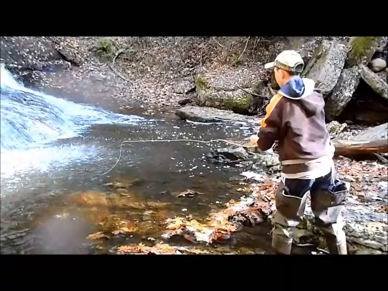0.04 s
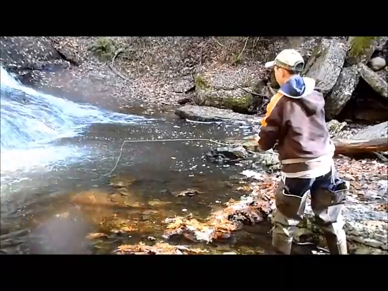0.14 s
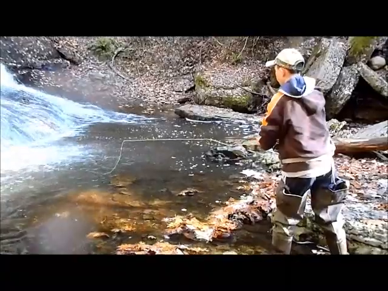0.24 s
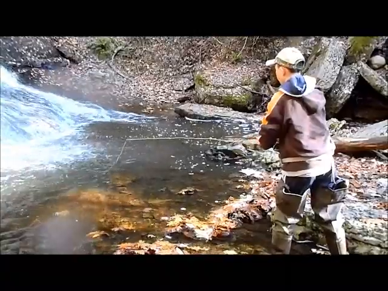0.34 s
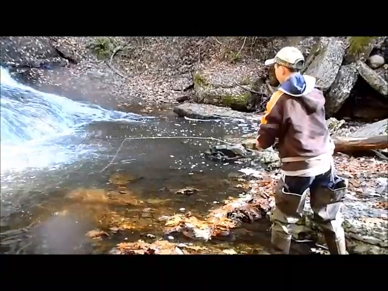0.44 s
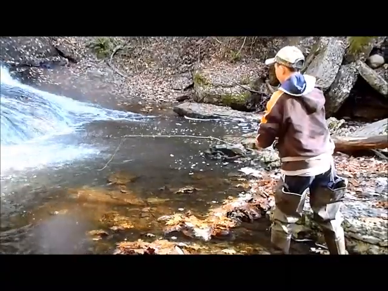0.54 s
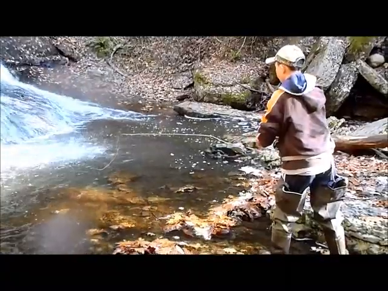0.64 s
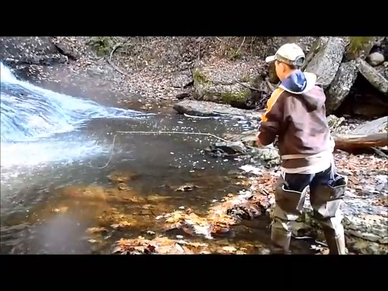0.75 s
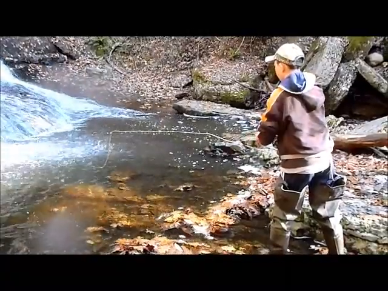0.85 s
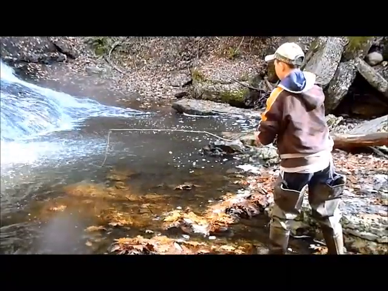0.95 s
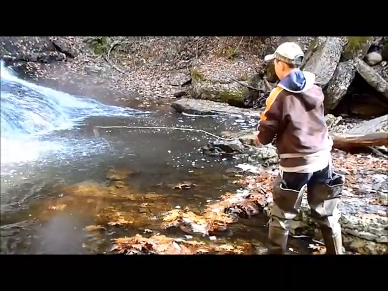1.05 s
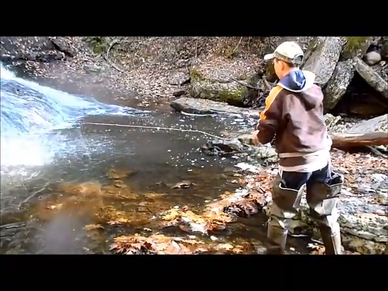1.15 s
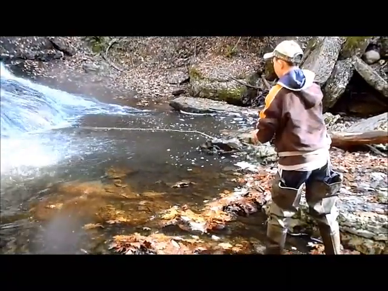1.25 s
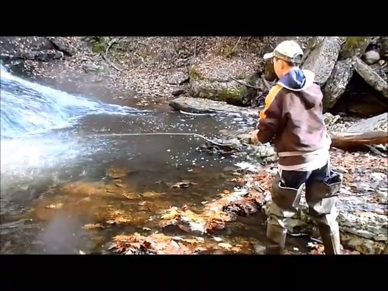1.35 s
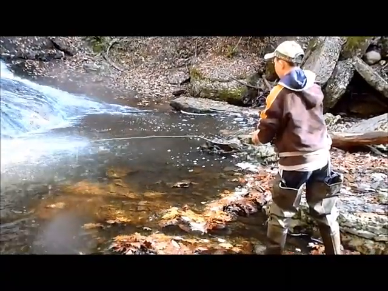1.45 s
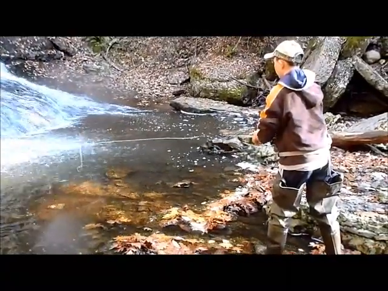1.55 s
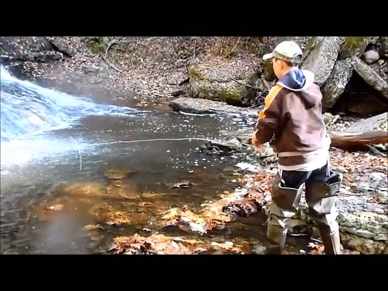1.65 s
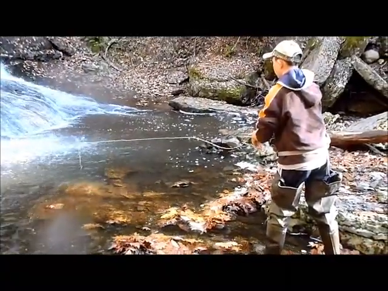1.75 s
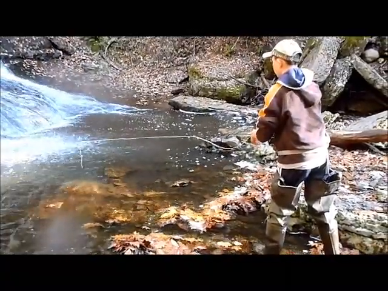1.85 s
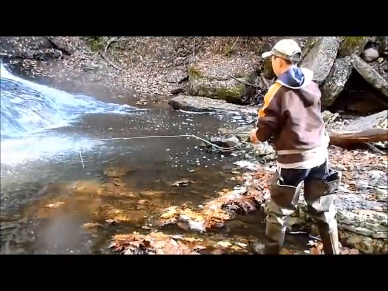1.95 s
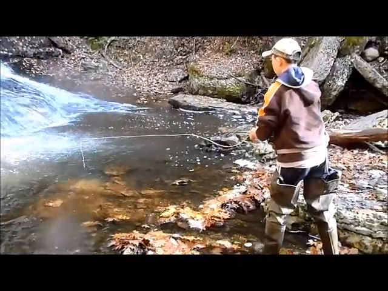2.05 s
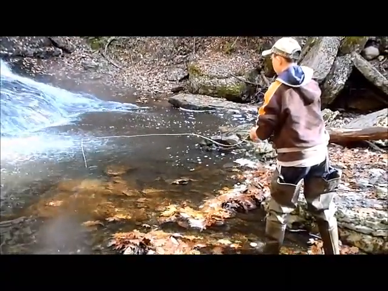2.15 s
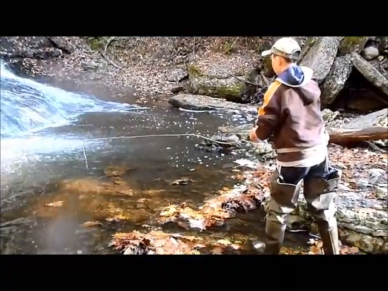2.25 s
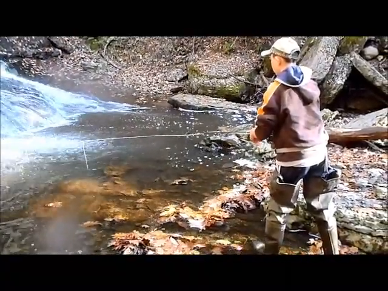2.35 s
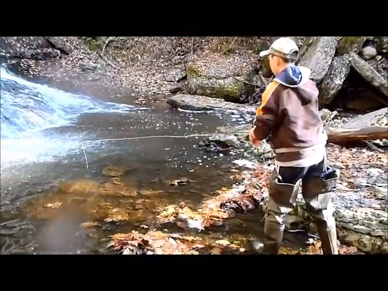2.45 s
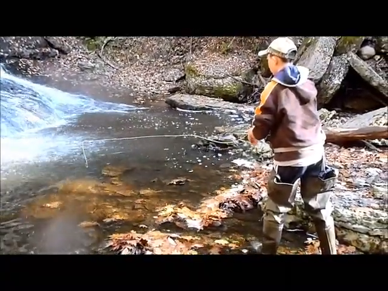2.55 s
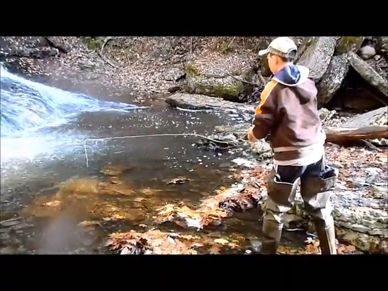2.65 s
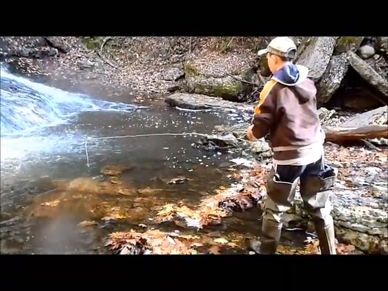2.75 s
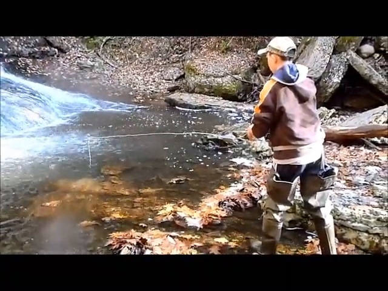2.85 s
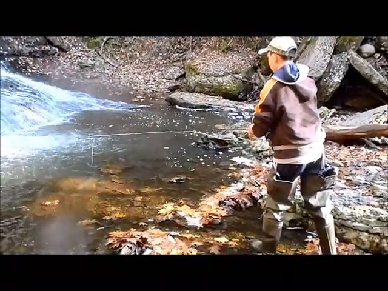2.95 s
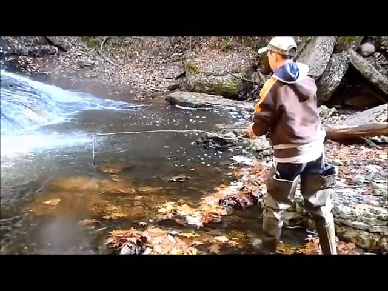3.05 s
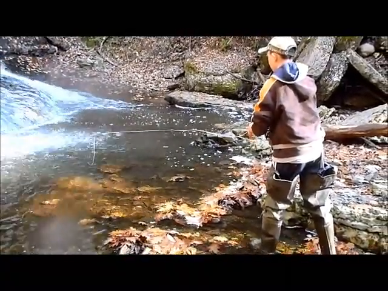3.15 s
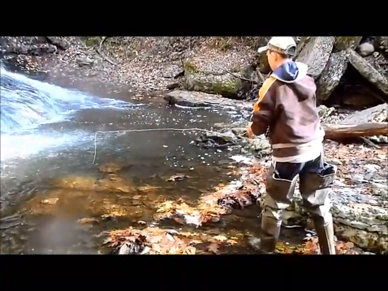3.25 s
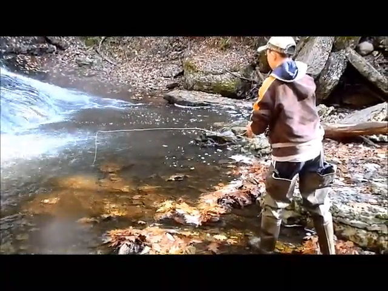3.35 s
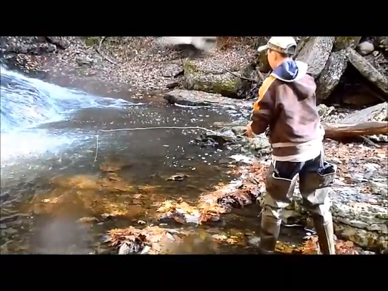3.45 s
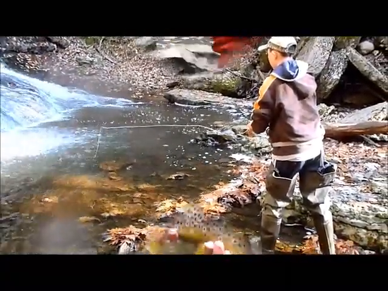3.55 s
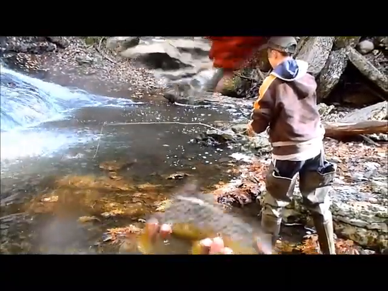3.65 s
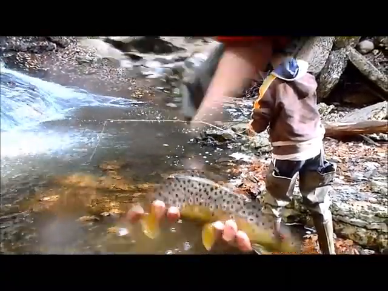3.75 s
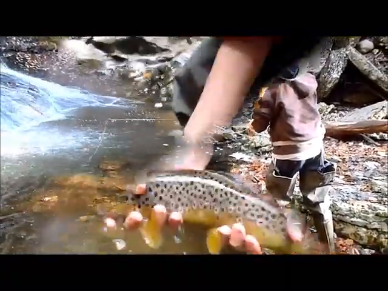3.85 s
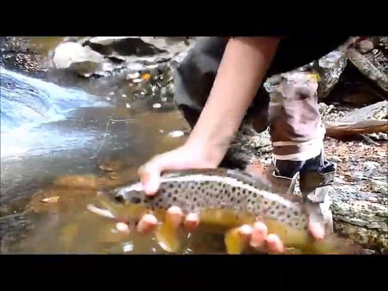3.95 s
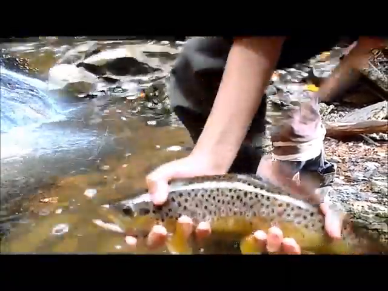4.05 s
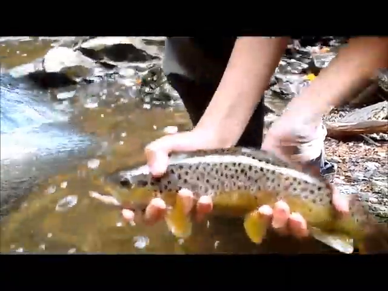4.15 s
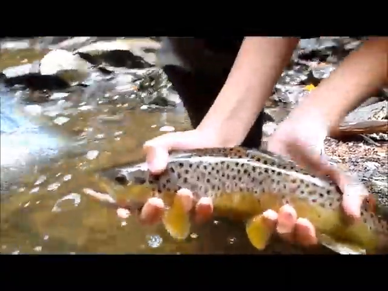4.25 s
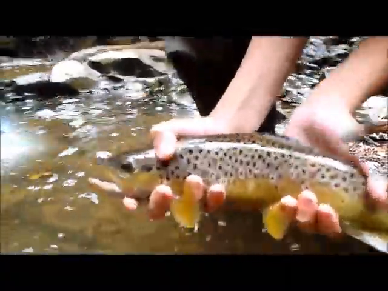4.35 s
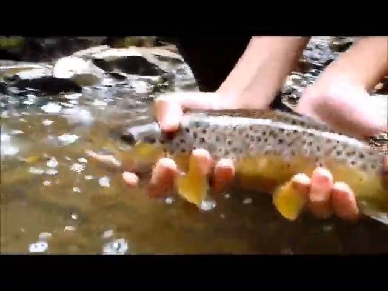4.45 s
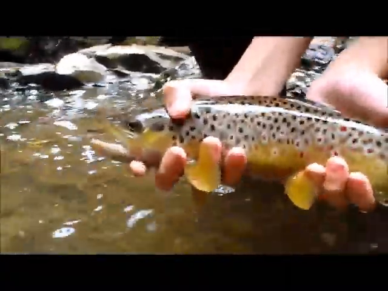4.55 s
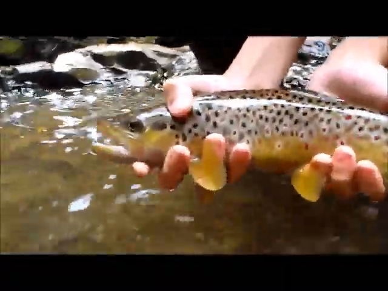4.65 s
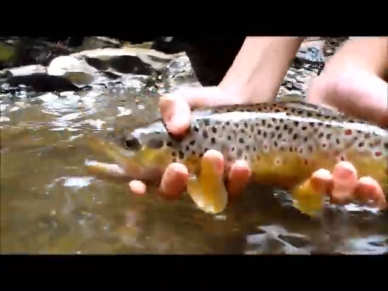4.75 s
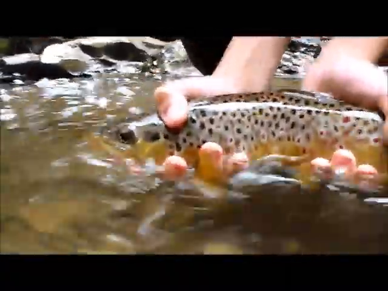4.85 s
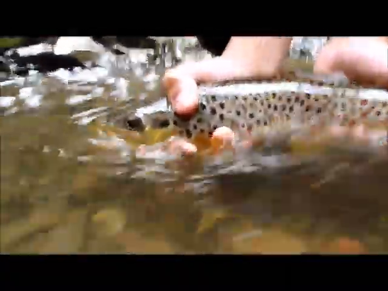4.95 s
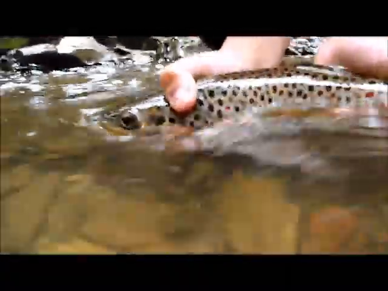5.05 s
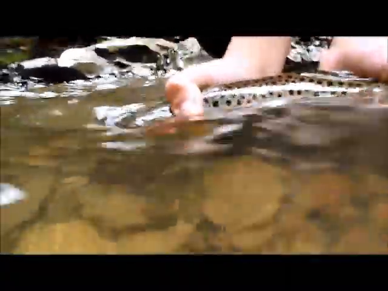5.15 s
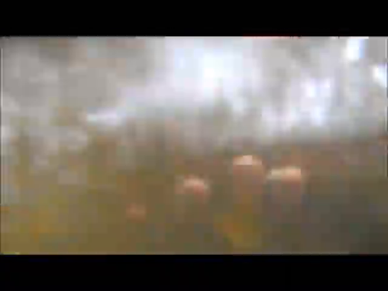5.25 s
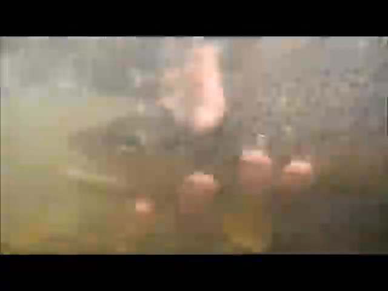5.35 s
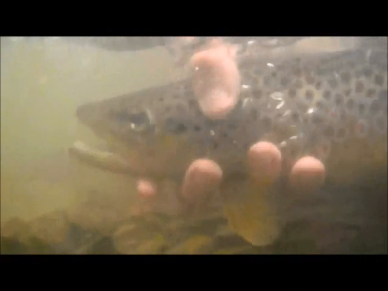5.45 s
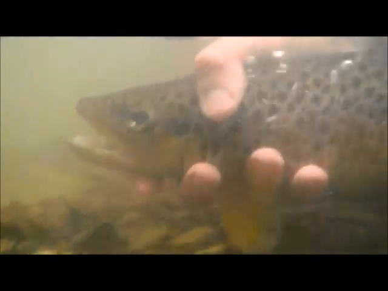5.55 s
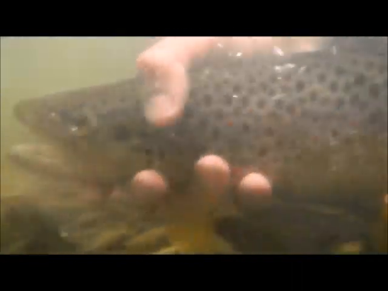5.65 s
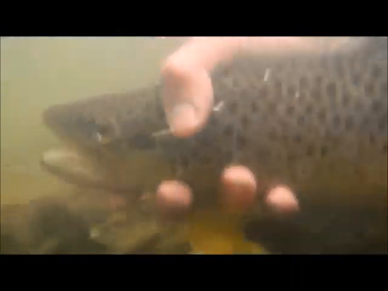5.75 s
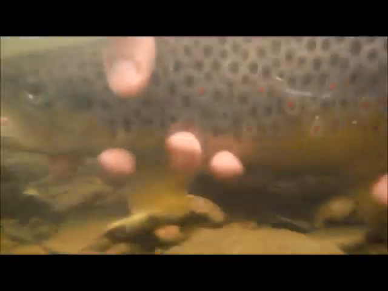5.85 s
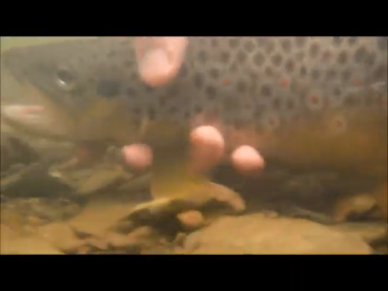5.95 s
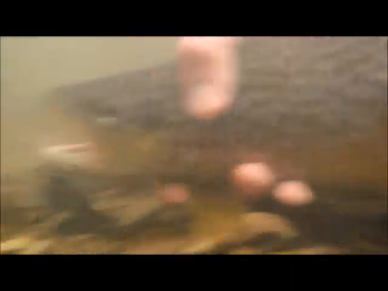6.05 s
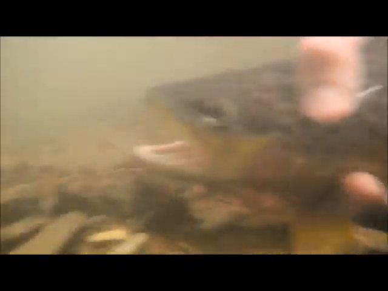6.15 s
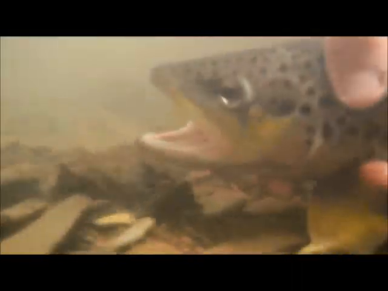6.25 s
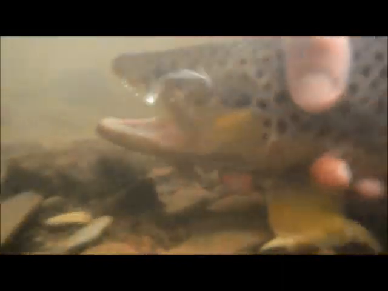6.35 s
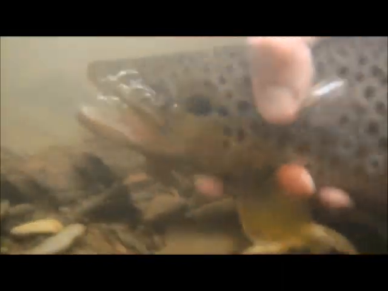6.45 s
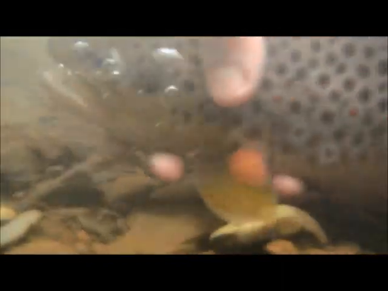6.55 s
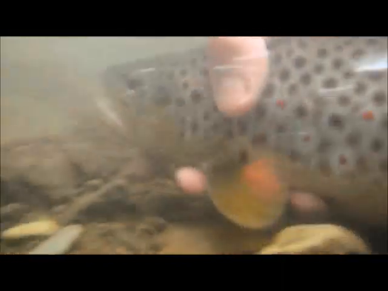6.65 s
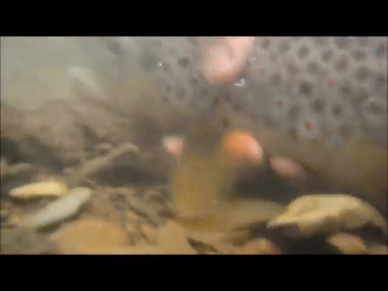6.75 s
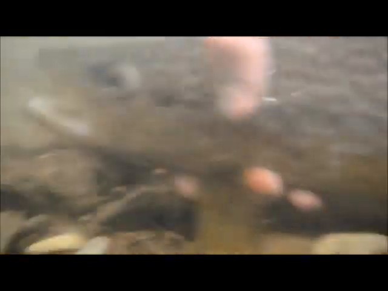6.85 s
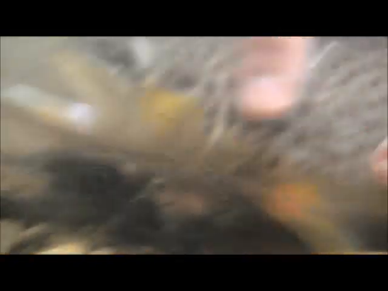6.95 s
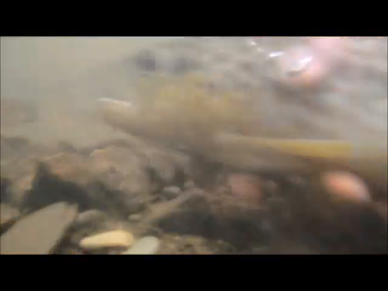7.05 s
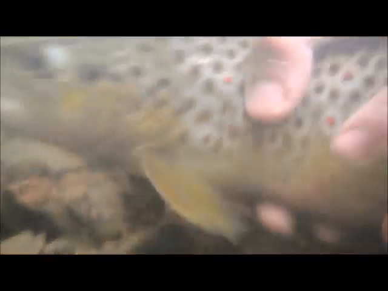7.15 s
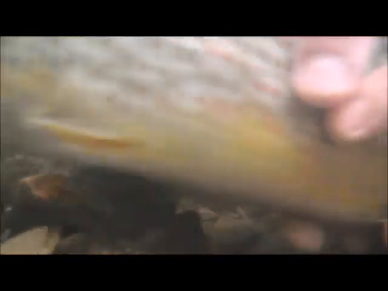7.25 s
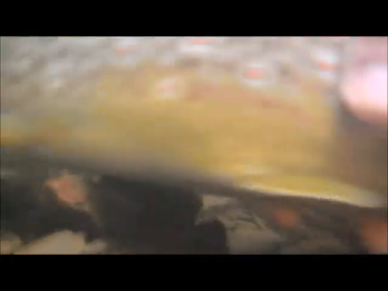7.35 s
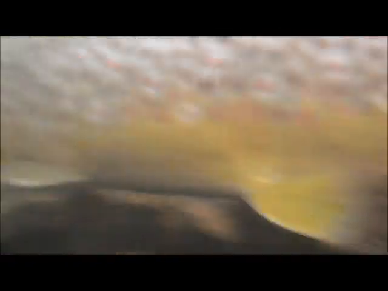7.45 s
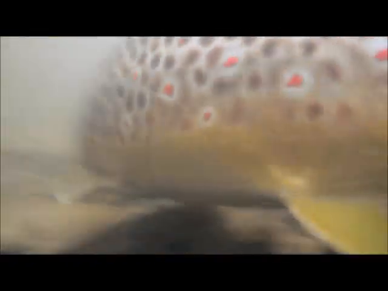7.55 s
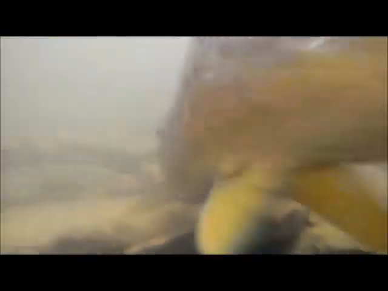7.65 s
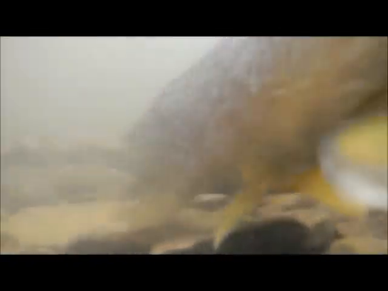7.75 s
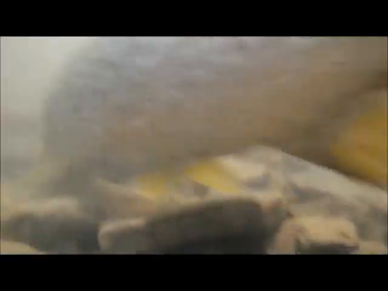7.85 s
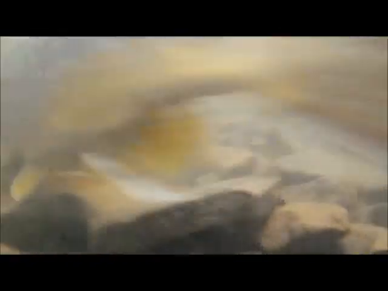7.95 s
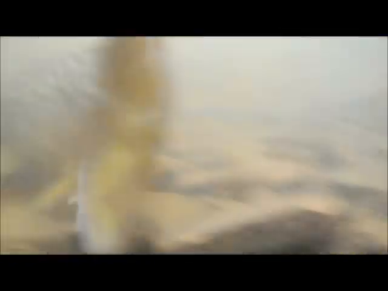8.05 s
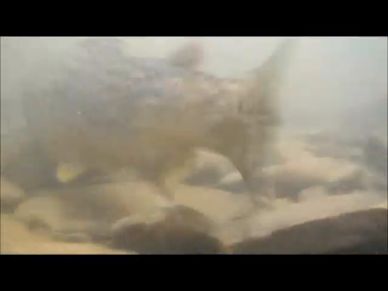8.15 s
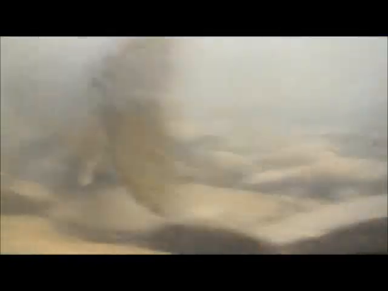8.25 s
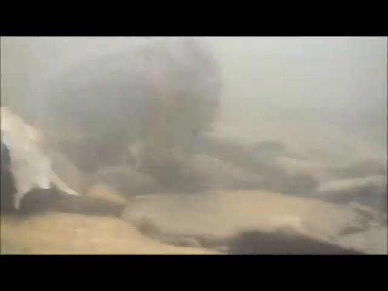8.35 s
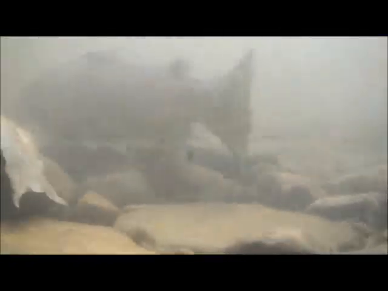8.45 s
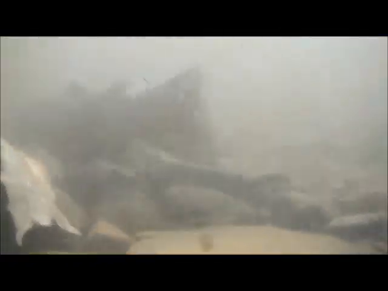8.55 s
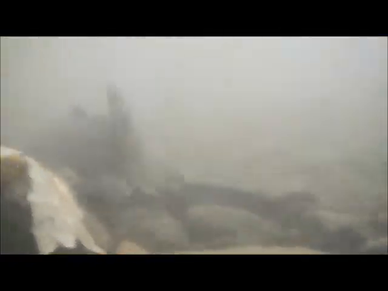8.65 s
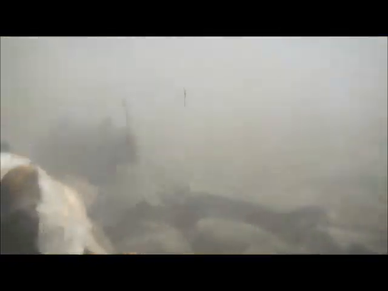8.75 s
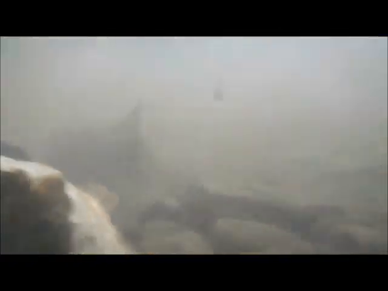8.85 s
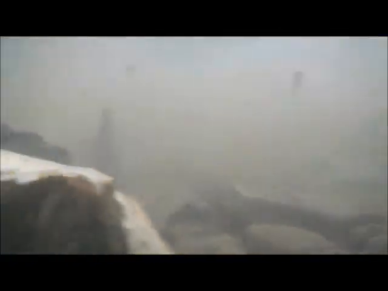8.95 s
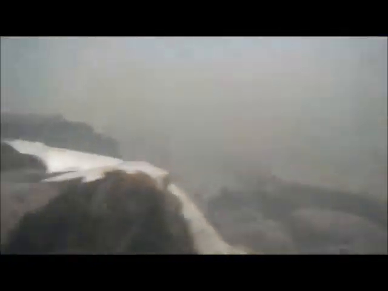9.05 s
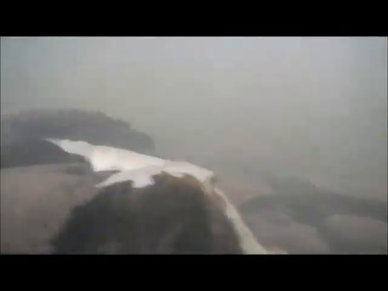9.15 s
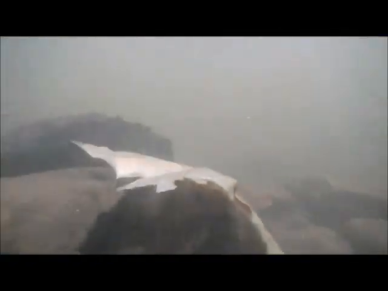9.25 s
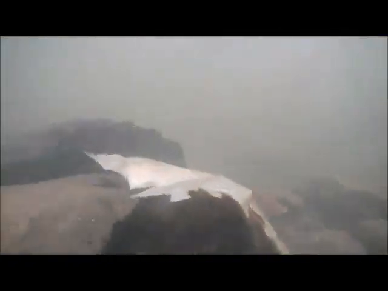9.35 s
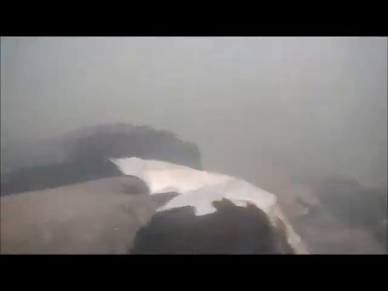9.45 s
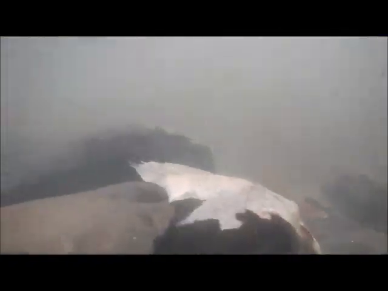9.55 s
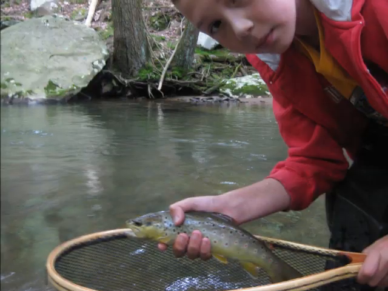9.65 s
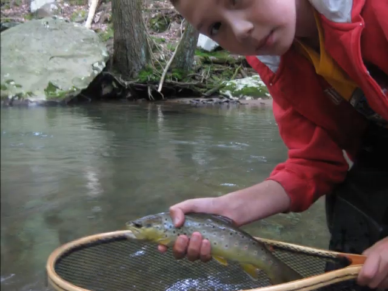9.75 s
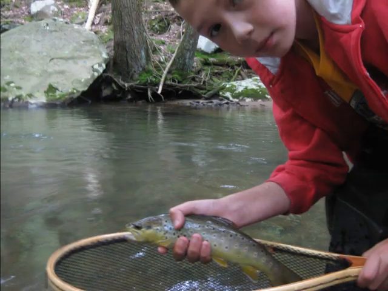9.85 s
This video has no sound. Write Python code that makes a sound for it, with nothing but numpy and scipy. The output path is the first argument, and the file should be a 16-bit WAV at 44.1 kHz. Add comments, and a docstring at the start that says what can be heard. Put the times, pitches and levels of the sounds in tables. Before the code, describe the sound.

A small waterfall hisses evenly across a creek pool. After about three seconds a closer, brighter riffle and faint breeze join, with a dull hand bump on the camera case. Then the microphone in its waterproof case plunges under: booming gulps overload it, bubbles ring and knock, a fingertip stutters over the plastic. Heavy throbs continue over muffled churning, then thin out, and the sound cuts dead.

```python
"""A small waterfall hisses across a creek pool, then a nearer riffle and a light breeze join it.
Dull blows of a hand on a waterproof camera case lead into the dip under water: air pockets gulp
and overload the microphone, bubbles ring and knock on the case, and a fingertip rubs over it.
The creek goes on as a muffled rumble, the riffle seeps back in, and the sound stops dead.
Water is made of ringing clicks and shaped noise, gulps and bubbles of wavering tones that die away."""
import sys
import numpy as np
from scipy import signal
from scipy.fft import rfft, irfft, next_fast_len
from scipy.io import wavfile

SR = 44100
rng = np.random.default_rng(int(sys.argv[2]) if len(sys.argv) > 2 else 0)


def generate_wav(sig):
    """Save sig (samples, or channels by samples) to the path in sys.argv[1] as 16-bit PCM at SR."""
    pcm = np.round(np.clip(np.atleast_2d(sig).T, -1, 1) * 32767).astype(np.int16)
    wavfile.write(sys.argv[1], SR, pcm)


N = 436580
T = np.arange(N) / SR  # the time of every sample (s)

# riffle and breeze begin, waterfall and breeze end, camera goes under, all sound stops (s)
RIFFLE_S, FALL_END_S, DIVE_S, END_S = 3.2, 4.71, 5.42, 9.71

# big bubbles pinching off, and how hard each knocks on the case:
# start_s [s], pitch_hz [Hz], level_db [dB], knock_db [dB, relative]
BIG_BUBBLES = [ (5.354, 570, -4, -17), (5.402, 766, -11.5, -26), (5.443, 2013, -6.5, -16),
               (5.554, 1125, -7, -26), (5.682, 894, 0.5, 0), (5.753, 1410, -10.5, -29),
               (5.878, 490, 1, -3.5), (5.908, 498, -4.5, -28), (5.983, 1020, -10, -32),
               (6.011, 893, 0.5, -13), (6.052, 1163, 1, -8), (6.098, 880, -9, -33), (6.122, 1390, -3, -4.5),
               (6.399, 980, -22.5, -15.5), (6.507, 1596, -7, -18), (6.650, 580, -9.5, -29),
               (6.704, 944, -5.5, -28), (6.725, 1510, -4.5, -10), (6.797, 716, -9, -27),
               (6.883, 1630, -10, -3), (6.894, 1580, -9, -1.5), (6.922, 1140, 1, -1),
               (6.950, 1120, -9.5, -5.5), (6.994, 1426, -11, -7), (7.283, 1672, -6.5, 0.5),
               (7.389, 888, -10.5, -30), (7.559, 1820, -2.5, -11), (7.838, 1850, -5.5, 2),
               (7.895, 1250, -2, -5), (7.963, 2900, -14.5, -1.5), (8.005, 641, -14, -35),
               (8.045, 874, -16.5, -33), (8.471, 787, -18.5, -9), (8.901, 750, -16.5, -27)]


def gulps(t60=0.021, wobble=0.14, glide=0.23, froth_hz=1500, froth_t60=0.012, fizz_db=-28,
          surge_db=-11, surge_hz=105, surge_t60=0.097):
    """A big air pocket throbs unevenly while water pushes it, sheds froth, then dies away."""
    # loud dull blows on the case, from the hand and then from gulping air pockets:
    # start_s [s], pitch_hz [Hz], level_db [dB], driven_s [s], froth_db [dB against the throb]
    loud_gulps = [ (3.959, 125, -11.5, 0.0053, -30), (5.301, 151, -6, 0.0018, -24),
                  (5.304, 534, 0, 0.0066, -29), (5.430, 378, -7, 0.0041, -5),
                  (5.459, 380, -5.5, .004, -9.5), (5.469, 207, -5, .008, -18),
                  (5.485, 244.4, 3.5, .016, -21), (5.554, 230, -0.5, 0.0059, -19),
                  (5.593, 238, 1, 0.0026, -19), (5.670, 265, 0, 0.0021, -18),
                  (5.802, 260, -16.5, 0.02, -15.5), (5.876, 185, 5, 0.0065, -25),
                  (5.892, 175, 4.5, 0.011, -27), (6.021, 138, -5.5, 0.005, -13),
                  (6.060, 122.5, -.5, 0.019, -22), (6.101, 130, -8.5, .017, -26),
                  (6.503, 163, 3.5, 0.0024, -13.5), (6.615, 109, -5, 0.007, -15),
                  (6.684, 107, 5.5, .012, -47), (6.722, 140, 3, 0.0048, -13.5),
                  (6.752, 173, 3, 0.0046, -45), (6.830, 211, 4, .013, -30), (6.859, 115, 1, .01, -48),
                  (6.919, 100, 4, .01, -29), (7.083, 184, -.5, .007, -29), (7.130, 243, -4, 0.036, -27),
                  (7.250, 99, 5, .012, -41), (7.278, 144.5, 0.5, 0.0084, -17), (7.428, 106, 4, .015, -43),
                  (7.450, 289, -2.5, .009, -18), (7.528, 113, 0.5, 0.0086, -39),
                  (7.552, 204.6, 2.5, .013, -22), (7.671, 117.2, 9.5, 0.028, -25.5),
                  (7.796, 109.7, 10.5, 0.022, -33), (7.854, 129, 4.5, .013, -49),
                  (7.884, 115.4, 10, 0.025, -24), (8.391, 138, -3.5, .009, -42),
                  (8.489, 287, -13.5, 0.016, -35), (8.575, 169, -7, 0.0055, -39),
                  (8.614, 229, -13.5, 0.031, -31), (8.642, 152, -5.5, 0.023, -46),
                  (8.675, 170, -5.5, .018, -47)]
    out, t = np.zeros(N), T[:SR // 8]
    for start_s, pitch_hz, level_db, driven_s, froth_db in loud_gulps + small_gulps():
        after = np.maximum(t - driven_s, 0)  # time since the push ended
        swell = np.sin(np.pi / 2 * np.minimum(t * pitch_hz / .5, 1))
        # the pocket shrinks as it sheds air, so its pitch rises
        rising = glide * (np.minimum(t / (driven_s + .008), 1.5) - .45)
        pitch = pitch_hz * np.exp(rising + wobble * drift(174, size=len(t)))
        throb = -np.sin(2 * np.pi * np.cumsum(pitch) / SR) * from_db(-60 * after / t60)

        white = rng.standard_normal(len(t))
        dull_froth = rms_one(low_pass(white, froth_hz, order=3))
        fizz = from_db(fizz_db) * rms_one(low_pass(white, 4000, order=3))
        froth_fade = from_db(froth_db - 60 * after / froth_t60 + 3.4 * drift(380, size=len(t)))
        froth = (dull_froth + fizz) * froth_fade

        # the displaced water presses slowly on the case, more so for big, low pockets
        surge_fade = from_db(surge_db - 60 * after / surge_t60) * np.sqrt(surge_hz / pitch_hz)
        surge = rms_one(low_pass(white, surge_hz)) * surge_fade
        add(out, start_s, from_db(level_db) * swell * (throb + froth + surge))
    return out


def small_gulps(low_hz=110, high_hz=320, level_db=-15, spread_db=4, longest_s=0.019, froth_db=-24):
    """Lesser pockets of random size gurgle between the loud ones: rows like those of the loud gulps."""
    rows = []
    born = escapes(per_s=20)
    for start_s, (smallness, strength, push) in zip(born, rng.random((len(born), 3))):
        pitch_hz = low_hz * (high_hz / low_hz) ** smallness
        own_level_db = level_db + spread_db * (2 * strength - 1)
        rows.append((start_s, pitch_hz, own_level_db, longest_s * push, froth_db))
    return rows


def booming(x, hz=295, q=5, boom_db=-2):
    """The air inside the case booms along with whatever presses on it."""
    return x + from_db(boom_db) * signal.lfilter(*signal.iirpeak(hz, q, fs=SR), x)


def bubbles(low_hz=550, stray_octaves=2.9, stray_db=-21, per_octave_db=-4, spread_db=6, cycles=38,
            tick_db=-4):
    """Big bubbles pinch off one by one; small stray ones ring too and tick against the case."""
    out, ticks = np.zeros(N), np.zeros(N)
    for start_s, pitch_hz, level_db, _ in BIG_BUBBLES:
        # a 1 kHz bubble at 0 dB rings 0.038 s; higher ones die sooner, gentle ones ring longer
        t60 = 0.038 * (1000 / pitch_hz) ** 0.76 * from_db(-0.35 * level_db)
        add(out, start_s, bubble(pitch_hz, level_db, t60))
    born = escapes(per_s=110)
    for start_s, (smallness, strength, touch) in zip(born, rng.random((len(born), 3))):
        octave = stray_octaves * smallness
        pitch_hz = low_hz * 2 ** octave
        level_db = stray_db + spread_db * (2 * strength - 1)
        add(out, start_s, bubble(pitch_hz, level_db + per_octave_db * octave, cycles / pitch_hz))
        add(ticks, start_s, touch * from_db([level_db + tick_db]))
    return out + case_ring(ticks)


def fragments(within_s=.016, least_octaves=.3, span_octaves=1.5, share_db=-7, per_octave_db=-8,
              cycles=42, count=2):
    """Each big bubble sheds smaller ones just after it forms, higher and fainter than itself."""
    out = np.zeros(N)
    for start_s, pitch_hz, level_db, _ in BIG_BUBBLES:
        for late, smallness in rng.random((count, 2)):
            octave = least_octaves + span_octaves * smallness
            small_hz = pitch_hz * 2 ** octave
            small_db = level_db + share_db + per_octave_db * octave
            add(out, start_s + within_s * late, bubble(small_hz, small_db, cycles / small_hz))
    return out


def bubble(hz, level_db, t60, rise=0.029, wobble=0.042, attack=0.00077, flutter_db=2.5):
    """A bubble rings at the pitch of its size, wavering as it changes shape and rising a little."""
    t = T[:SR // 6]
    pitch = hz * (1 + rise * np.minimum(t / t60, 1) + wobble * drift(350, size=len(t)))
    fade = from_db(level_db - 60 * t / t60 + flutter_db * drift(360, size=len(t)))
    onset = 1 - np.exp(-t / attack)
    return fade * onset * np.sin(2 * np.pi * np.cumsum(pitch) / SR)


def escapes(per_s):
    """Random moments when air carried down escapes: rarer after the dive, none under a finger."""
    # a finger covers the case: from_s [s], to_s [s]
    covered_s = (6.17, 6.49)
    covered = (T > covered_s[0]) & (T < covered_s[1])
    air_lasts_s = 1.0
    chance = per_s / SR * np.exp(-np.abs(T - DIVE_S) / air_lasts_s)
    return T[(rng.random(N) < chance) & (T > DIVE_S) & ~covered]


def knocks(crack_db=-13, crack_hz=4200, crack_t60=0.0042, hardening=2.9):
    """A knock is a short crack with the ring of the case; harder knocks crack much more."""
    clicks, cracks, t = np.zeros(N), np.zeros(N), T[:SR // 40]
    for start_s, _, _, knock_db in BIG_BUBBLES:
        add(clicks, start_s, from_db([knock_db - 11]))
        crack_fade = from_db(hardening * knock_db + crack_db - 60 * t / crack_t60)
        add(cracks, start_s, rng.standard_normal(len(t)) * crack_fade)
    return case_ring(clicks) + low_pass(cracks, crack_hz, order=3)


def case_ring(clicks):
    """Every touch sets the same few tones of the case ringing."""
    # tones of the flooded case: pitch_hz [Hz], level_db [dB], t60_s [s to fall by 60 dB]
    case_tones = [(226, 5.5, 0.036), (640, 3, 0.011), (1010, 0, 0.0079), (1460, 4, 0.0058),
                  (2526, -7, 0.0091), (3600, -22, 0.015), (5100, -36, .006)]
    out = np.zeros(N)
    for k, (pitch_hz, level_db, t60_s) in enumerate(case_tones):
        out += (-1) ** k * from_db(level_db) * ring(clicks, pitch_hz, t60_s)
    return out


def rubbing(fade_db=-7, relax_s=.004, soft_hz=600, tick_db=-15, tick_low_hz=1600, tick_high_hz=3200,
            tick_t60=0.005):
    """Each fingertip slip dents the case with its own gritty tick; slips slow as the finger stops."""
    # a fingertip stuttering over the case:
    # start_s [s], lasts_s [s], slips_per_s [per s], level_db [dB at the first slip, before chance]
    rubs = [(5.933, .004, 100, -7), (6.149, .004, 100, -2), (6.214, 0.032, 130, 2), (6.263, 0.06, 107, 0.5)]
    slips, ticks, t = np.zeros(N), np.zeros(N), T[:SR // 100]
    for start_s, lasts_s, slips_per_s, level_db in rubs:
        for since in np.arange(0, lasts_s, 1 / slips_per_s):
            done = since / lasts_s
            at = start_s + since + .0008 * rng.normal() + 0.0034 * done ** 2
            strength = from_db([level_db + fade_db * done + 2.8 * rng.normal()])
            add(slips, at, strength)
            tick_fade = from_db(tick_db - 60 * t / tick_t60)
            add(ticks, at, strength * rng.standard_normal(len(t)) * tick_fade)
    # the dented case springs back
    dents = signal.lfilter([-1], [1, -np.exp(-1 / (relax_s * SR))], slips + 1e-18)
    dents = signal.sosfilt(signal.butter(1, 60, "high", fs=SR, output="sos"), dents)
    tick_band = signal.butter(2, [tick_low_hz, tick_high_hz], "band", fs=SR, output="sos")
    return low_pass(dents, soft_hz) + signal.sosfilt(tick_band, ticks + 1e-18)


def underwater(churn_db=-22.5, rush_db=-32):
    """The current churns round the case while the fall's bubbles come muffled through its wall."""
    # spectrum of the churning: pitch_hz [Hz], level_db [dB per Hz, relative]
    churn_colour = [(20, -7), (45, 4), (90, -1), (125, -1), (170, -3), (230, 3), (290, -4), (350, -15),
                    (600, -18.5), (1500, -72)]
    # spectrum of the muffled rush: pitch_hz [Hz], level_db [dB per Hz, relative]
    rush_colour = [(200, -15), (380, -2.5), (480, -6), (640, 1.5), (950, -5.5), (1500, 0), (2100, -17),
                   (3000, -28.5), (3850, -31), (4300, -43), (7000, -54.5), (14000, -63.5)]
    # brief dips and swells: middle_s [s], half_width_s [s], churn_change_db [dB], rush_change_db [dB]
    ebbs = [(5.76, 0.29, -1, -14.5), (6.25, 0.074, -2.5, -6), (6.37, 0.095, -14, -20),
            (6.8, 0.067, 1.5, -8), (7.02, .06, -9.5, -12), (7.97, 0.044, -1, -12), (8.55, 0.16, 4.5, -1),
            (9.3, 0.52, -3.5, 0.5), (9.67, 0.084, 7, 0.5)]
    churn_change_db, rush_change_db = np.array(ebbs)[:, 2:].T @ bells(ebbs)
    churn = coloured(rng.standard_normal(N), churn_colour)
    churn = churn * from_db(churn_db + churn_change_db + 3.0 * drift(30))
    rush = coloured(white_water(per_s=2500, cycles=44, spread_db=3.0, spray_db=3.5), rush_colour)
    rush = rush * from_db(rush_db + rush_change_db + 0.93 * drift(25))
    return (churn + rush) * np.clip((T - DIVE_S) / .1, 0, 1)


def riffle():
    """Nearer water babbles with fewer, clearer bubbles; it fades as the camera sinks, then seeps back."""
    # spectrum of the riffle: pitch_hz [Hz], level_db [dB per Hz, relative]
    riffle_colour = [(20, -7.5), (100, -5.5), (190, -2.5), (340, -3.5), (470, -2.5), (700, -3), (840, -5),
                     (930, -1), (1450, -2), (2200, -5), (2900, -5.5), (4200, -17), (6000, -26.5),
                     (9000, -37), (11500, -45.5), (14500, -59)]
    sinking_db = -25 - 150.5 * np.maximum(T - 5.39, 0)  # steady at first, then falling in dB per s
    rising_db = -47 - 18.5 * (END_S - T)  # climbing in dB per s as the camera rises
    level_db = np.maximum(sinking_db, rising_db)
    babble = coloured(white_water(per_s=3500, cycles=20, spread_db=2.5, spray_db=5.0), riffle_colour)
    return babble * from_db(level_db + .5 * drift(14)) * np.clip((T - RIFFLE_S) / 0.018, 0, 1)


def waterfall(level_db=-26.5):
    """Far away the bubbles merge into an even rush."""
    # spectrum of the waterfall: pitch_hz [Hz], level_db [dB per Hz, relative]
    fall_colour = [(20, 2), (55, 4), (140, -10), (290, -8), (430, -13.5), (660, -9.5), (840, -13),
                   (1000, -6.5), (1500, -3), (2000, -5.5), (2650, -1.5), (3400, -7), (4400, -24.5),
                   (5200, -18.5), (6200, -34.5), (6900, -32.5), (8100, -45), (9400, -42), (14000, -57)]
    rush = coloured(white_water(per_s=9000, cycles=26.0, spread_db=3.5, spray_db=6), fall_colour)
    return rush * from_db(level_db + 0.21 * drift(14)) * np.clip((FALL_END_S - T) / 0.0088, 0, 1)


def low_rumbles(breeze_db=-46.5):
    """Low rumbles on the microphone: a light breeze, a bump of the hand and a puff."""
    # the thud of a hand bump on the case, then a puff of air:
    # middle_s [s], half_width_s [s], level_db [dB]
    bump_and_puff = [(3.98, .025, -26), (4.63, .11, -43)]
    breeze = from_db(breeze_db) * (T > RIFFLE_S) * (T < FALL_END_S)
    swells = from_db(np.array(bump_and_puff)[:, 2]) @ bells(bump_and_puff)
    return (breeze + swells) * rms_one(low_pass(rng.standard_normal(N), 180))


def white_water(per_s, cycles, spread_db, spray_db, count=28):
    """Countless bubbles of many sizes, each ringing for some cycles, over the smooth hiss of spray."""
    out = np.zeros(N)
    for hz in np.geomspace(350, 7000, count):
        draws = rng.random((int(per_s * N / SR / count), 3))
        clicks = np.zeros(N)
        sizes = from_db(spread_db * np.minimum(-np.log(1 - draws[:, 1]), 5))
        clicks[(draws[:, 0] * N).astype(int)] = sizes * np.sign(draws[:, 2] - .5)
        out += rms_one(ring(clicks, hz, cycles / hz)) * np.sqrt(hz)
    return rms_one(out) + from_db(spray_db) * rng.standard_normal(N)


def ring(clicks, hz, t60):
    """A click of height 1 sets a sine of height 1 ringing, 60 dB weaker after t60 seconds."""
    r, w = from_db(-60 / (t60 * SR)), 2 * np.pi * hz / SR
    return signal.lfilter([0, np.sin(w)], [1, -2 * r * np.cos(w), r * r], clicks + 1e-18)


def coloured(x, spectrum):
    """Give a flat sound a spectrum, weakened below 20 Hz; average strength (rms) 1."""
    hz, db = np.transpose(spectrum)
    size = next_fast_len(N)
    f = np.maximum(np.fft.rfftfreq(size, 1 / SR), 1)
    gain = from_db(np.interp(np.log(f), np.log(hz), db)) * np.minimum(f / 20, 1) ** 2
    return rms_one(irfft(rfft(x, size) * gain, size)[:N])


def drift(rate, size=N):
    """A slow random wander around 0, with a new random target `rate` times per second."""
    knots = np.arange(size) * rate / SR
    count = int(knots[-1]) + 2
    return np.interp(knots, np.arange(count), rng.standard_normal(count))


def bells(rows):
    """One smooth bump of height 1 for each row that begins with middle_s, half_width_s."""
    return np.array([np.exp(-((T - s) / width) ** 2) for s, width, *_ in rows])


def low_pass(x, hz, order=2):
    """Dull a sound by weakening what lies above a pitch."""
    return signal.sosfilt(signal.butter(order, min(hz, .45 * SR), fs=SR, output="sos"), x)


def from_db(db):
    """Turn decibels into a multiplying factor."""
    return 10 ** (np.asarray(db) / 20)


def rms_one(x):
    """Scale a sound to an average strength (rms) of 1."""
    return x / np.sqrt(np.mean(x ** 2) + 1e-20)


def add(out, s, sound):
    """Mix a sound in at a time (s)."""
    at = int(s * SR)
    out[at:at + len(sound)] += sound[:N - at]


def scene():
    """The creek from the bank, then from under its surface."""
    above = waterfall() + riffle() + low_rumbles()
    on_case = booming(gulps()) + knocks() + rubbing()
    below = underwater() + bubbles() + fragments()
    return (above + on_case + below)[None]


def record(dry, hardness=4.7, stick_hz=450, overload=.91, cutoff_hz=16400):
    """Loud gulps overload the microphone; in a long deep dip it sticks, then snaps back."""
    flattened = dry / (1 + np.abs(dry / overload) ** hardness) ** (1 / hardness)
    # 0 = free, 1 = stuck: pulled down towards the lowest level
    stuck = np.clip(10 * (-low_pass(dry, stick_hz, order=1) / overload - 1.4), 0, 1)
    heard = flattened - low_pass(stuck * (flattened + overload), 4500)
    stopped = heard * (T < END_S)  # the sound stops dead
    return signal.sosfilt(signal.cheby2(12, 70, cutoff_hz, fs=SR, output="sos"), stopped)


dry = scene()
out = record(dry)
generate_wav(out)
```